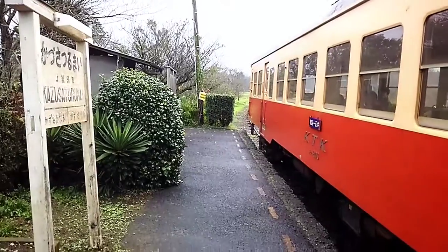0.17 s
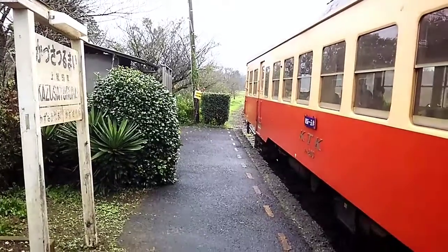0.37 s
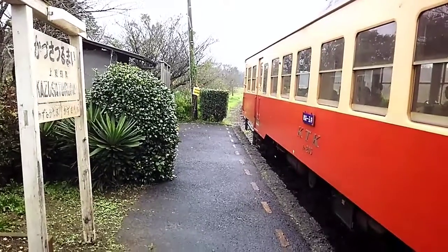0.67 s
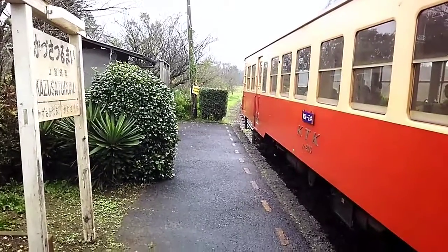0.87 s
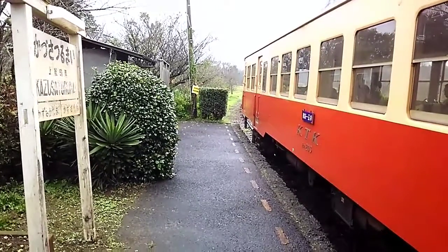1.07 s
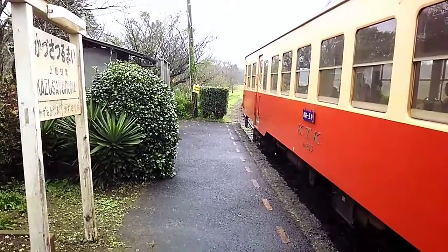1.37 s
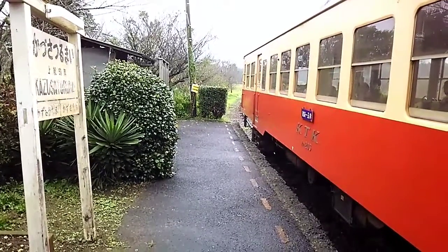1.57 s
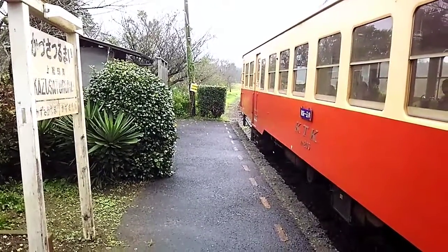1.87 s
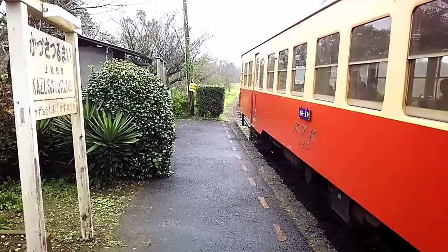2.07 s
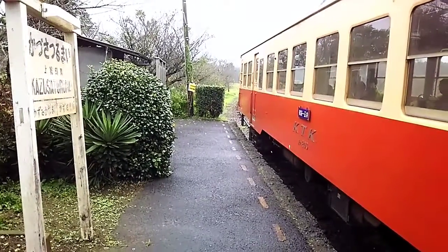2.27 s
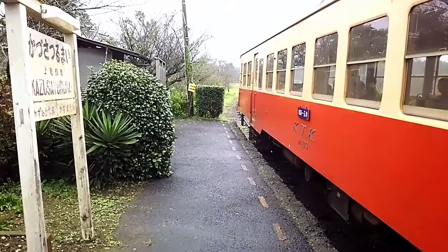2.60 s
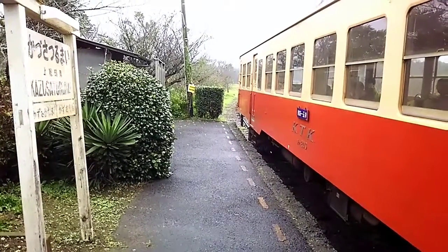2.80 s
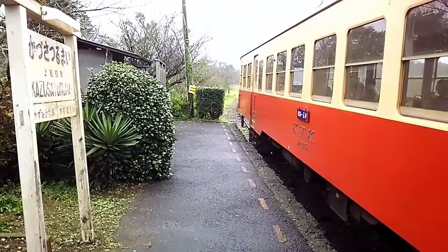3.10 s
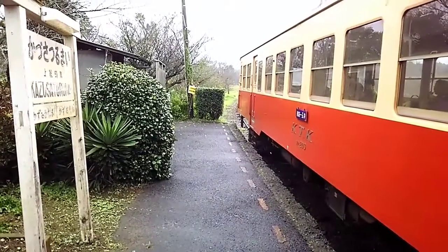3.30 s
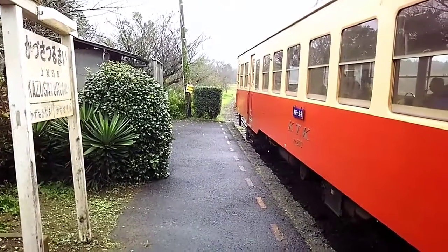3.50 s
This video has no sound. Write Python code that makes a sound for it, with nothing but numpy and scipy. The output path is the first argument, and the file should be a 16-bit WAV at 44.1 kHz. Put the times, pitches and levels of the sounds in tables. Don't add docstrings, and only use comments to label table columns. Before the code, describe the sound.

A diesel railcar engine fades in at a rattly idle, then takes up load with a bright coupling clank, a second duller clank with thuds, and a rising low exhaust growl, heard from an open platform.

```python
import sys
import numpy as np
from scipy import signal
from scipy.fft import rfft, irfft
from scipy.io import wavfile
from scipy.ndimage import uniform_filter1d

SR = 44100
rng = np.random.default_rng(int(sys.argv[2]) if len(sys.argv) > 2 else 0)


def put_to_file(sound):
    columns = np.atleast_2d(sound).T
    safe = np.clip(columns, -1, 1)
    whole_steps = np.round(safe * 32767)
    wavfile.write(sys.argv[1], SR, whole_steps.astype(np.int16))


def rack_gain(trim_db):
    fader = np.asarray(trim_db, float)
    return 10 ** (fader / 20)


N = 160965
LOAD_FROM_S, LOAD_OVER_S = 1.45, 0.14
# frequency in Hz, level in dB.
CLATTER_IDLE = [(1120, -8.5), (1900, -11.5), (2600, -14), (3360, -2.5), (3750, -8.5), (6460, -6),
                (7340, -16.5), (13700, -60), (14500, -68)]
CLATTER_LOAD = [(1120, -52), (1900, -23), (2100, -10), (3160, -12.5), (3660, -3), (5270, -4), (6690, -1),
                (11700, -23), (13000, -28), (14000, -45)]
# frequency in Hz, level in dB.
CLANK_SPECTRA = [
    [(150, -20), (300, -7.5), (800, -2), (1200, -13), (1610, -10), (1890, -6), (2180, -7.5), (6510, 0),
     (13500, -26)],
    [(200, -23), (400, -12), (572, -2.5), (1330, -10.5), (5240, -14), (6900, -13), (9000, -37),
     (14000, -69)],
    [(1180, -41), (2000, -7), (4660, -10.5), (6670, -2), (14000, -35)],
]


def evened(x):
    return x / np.sqrt(np.mean(x ** 2) + 1e-20)


def add(mix, s, sound):
    part = mix[round(s * SR):][:len(sound)]
    part += sound[:len(part)]


def colour(x, points):
    f, db = np.transpose(points)
    hz = np.fft.rfftfreq(len(x), 1 / SR)
    gain = rack_gain(np.interp(np.log(hz + 1), np.log(f + 1), db, -90, -90))
    return evened(irfft(rfft(x) * gain, len(x)))


def resonate(x, hz, width):
    turn = np.exp(2j * np.pi * hz * np.arange(len(x)) / SR)
    r = np.exp(-np.pi * width / SR)
    return 2 * (turn * signal.lfilter([1 - r], [1, -r], x / turn)).real


def blow(rise, t60, size=22050):
    t = np.arange(size) / SR
    contact = np.sin(np.pi / 2 * np.minimum(t / rise, 1)) ** 2
    return contact * rack_gain(-60 * np.maximum(t - rise, 0) / t60)


def patchy(bins, frames, depth_db):
    a, b, p = rng.standard_normal((N // 128 + 5, 257, 3)).T
    p = uniform_filter1d(p, size=bins, axis=0)
    p = evened(uniform_filter1d(p, size=frames, axis=1))
    return signal.istft((a + 1j * b) * rack_gain(depth_db * p), nperseg=512, noverlap=384)[1][:N]


def bumps():
    # start in seconds, level in dB, ring in Hz.
    frame_knocks = [(0.385, -19, 385), (0.696, -10.5, 267), (0.729, -10, 269), (1.301, -13.5, 1440),
                    (1.496, -15, 393), (1.599, -13.5, 376), (1.629, -14, 263), (1.659, -21, 242),
                    (1.749, -21, 374), (1.85, -30, 1090), (1.864, -8.5, 200), (1.874, -15, 393),
                    (2.03, -23, 210), (2.091, -30, 288), (2.16, -16, 1070), (2.281, -13.5, 1410),
                    (2.299, -13, 845), (2.331, -21, 280), (2.363, -9.5, 287), (2.687, -17.5, 265),
                    (2.904, -23, 312), (2.933, -24, 277), (3.009, -12.5, 298), (3.089, -13, 428),
                    (3.202, -11.5, 382), (3.265, -8.5, 288), (3.38, -13, 202), (3.529, -12, 254),
                    (3.578, -13, 355), (3.634, -22, 592)]
    # start in seconds, level in dB.
    contacts = [(1.866, -16), (1.871, -18), (1.878, -12.5), (1.888, -16), (1.896, -10), (1.925, -15.5),
                (2.328, -16), (2.336, -13), (2.346, -11.5), (2.435, -25), (3.371, -27), (3.387, -23)]
    out = np.zeros(N)
    for s, db, hz in frame_knocks:
        noise = rng.standard_normal(4096)
        ring = evened(resonate(noise, hz, 55))
        ring += 0.52 * evened(resonate(resonate(noise, hz, 560), hz, 560))
        add(out, s - .004, rack_gain(db - 10.5) * ring * blow(0.0033, .16, size=4096))
    for s, db in contacts:
        clank = int(s > 2) + int(s > 3)
        crack = colour(rng.standard_normal(2048), CLANK_SPECTRA[clank])
        add(out, s - .001, rack_gain(db) * crack * blow(0.00043, 0.14, size=2048))
    return out


def thuds():
    # start in seconds, pitch in Hz.
    blows = [(.70, 268), (1.685, 75), (1.858, 165), (1.868, 100), (1.914, 75), (2.324, 288), (2.358, 275),
             (2.332, 870), (2.411, 75), (3.375, 345), (1.74, 200), (1.94, 140), (2.91, 90), (2.865, 78),
             (3.374, 150), (3.258, 290), (3.47, 125)]
    # level in dB, t60 in seconds.
    strengths = [(-15, 0.27), (-11.5, 0.095), (-10, 0.19), (-11.5, 0.17), (-11.5, 0.24), (-5.5, 0.084),
                 (-19.5, 0.41), (-14.5, 0.18), (-17.5, .14), (-18.5, 0.24), (-23, 0.13), (-19.5, .3),
                 (-21, .3), (-9.5, 0.08), (-11, 0.091), (-16.5, 0.23), (-20, 0.68)]
    out, t = np.zeros(N), np.arange(22050) / SR
    for (s, hz), (db, t60) in zip(blows, strengths):
        add(out, s, rack_gain(db) * np.sin(2 * np.pi * hz * t) * blow(0.012, t60))
    return out


def squeak():
    # start in seconds, end in seconds, pitch in Hz, level in dB.
    brake = (2.335, 2.422, 6960, -29)
    start, end, hz, db = brake
    t = np.arange(round((end - start) * SR)) / SR
    swell = np.sin(np.pi * t / t[-1]) ** 0.32
    rough = 0.77 * evened(resonate(rng.standard_normal(len(t)), hz, 60))
    out = np.zeros(N)
    add(out, start, rack_gain(db) * swell * (np.sin(2 * np.pi * hz * t) + rough))
    return out


def clanks():
    # start in seconds, level in dB, rise in seconds, t60 in seconds.
    strikes = [
        (1.861, -14.5, 0.012, 0.65),
        (2.324, -13, 0.013, 0.47),
        (3.366, -20.5, 0.0028, 1.08),
    ]
    # frequency in Hz, level in dB, t60 in seconds.
    clank_modes = [
        [(1670, -11, 0.27), (2380, -1.5, 0.12), (2820, -5, 0.077), (3620, -10, 0.063), (5000, -28, 0.33),
         (6650, -14, 0.94)],
        [(544, -11, 0.32), (2020, -16, 0.22), (3610, -10.5, 0.21), (5990, -13, 0.092), (850, -15, 0.56),
         (318, -18, 0.34)],
        [(6500, -13, 0.44)],
    ]
    out = np.zeros(N)
    for (s, db, rise, t60), tone, modes in zip(strikes, CLANK_SPECTRA, clank_modes):
        flutter = evened(uniform_filter1d(rng.standard_normal(22050), size=150))
        noise = rng.standard_normal(22050) * rack_gain(1.6 * flutter)
        rings = 0
        for hz, mode_db, mode_t60 in modes:
            ring = evened(resonate(resonate(noise, hz, 99), hz, 950))
            rings = rings + rack_gain(mode_db) * ring * blow(rise, mode_t60)
        add(out, s, rack_gain(db) * (colour(noise, tone) * blow(rise, t60) + 1.87 * rings))
    return out


def knocks():
    # start in seconds, level in dB, ring in Hz.
    hard_knocks = [(0.0385, -11.5, 5470), (0.1525, -20, 3300), (0.2234, -15, 3340), (0.2628, -16.5, 4160),
                   (0.4436, -14.5, 3250), (0.5132, -13, 3460), (0.613, -13.5, 6370), (0.7202, -19.5, 3300),
                   (0.9767, -26, 6600), (1.0135, -12, 3450), (1.118, -18.5, 3150), (1.1906, -21, 3160),
                   (1.2616, -19.5, 4020), (1.2974, -15.5, 3390), (1.4681, -16, 3460), (1.5084, -29, 5440),
                   (1.5319, -9.5, 3760), (1.534, -14, 4200), (1.8246, -16.5, 2360), (2.0303, -18, 3380),
                   (2.2504, -16, 3640), (2.253, -20, 4300), (2.279, -20.5, 3550), (2.2907, -13, 7050),
                   (2.4339, -16, 3500), (2.5025, -15.5, 5650), (2.528, -22.5, 3600), (2.67, -18, 3780),
                   (2.7247, -15, 3660), (2.81, -20, 3730), (2.9223, -14.5, 3680), (3.03, -20.5, 4000),
                   (3.0959, -14.5, 3760), (3.25, -21, 3750), (3.33, -20, 3820), (3.6076, -30, 6660)]
    out = np.zeros(N)
    for s, db, hz in hard_knocks:
        noise = rng.standard_normal(8192)
        ring = 1.27 * evened(resonate(resonate(noise, hz, 140), hz, 1300))
        ring += 0.33 * evened(resonate(resonate(noise, 1.16 * hz, 260), 1.22 * hz, 1200))
        ring += colour(noise, CLATTER_IDLE if s < LOAD_FROM_S + LOAD_OVER_S else CLATTER_LOAD)
        add(out, s - .003, rack_gain(db - 12.5) * ring * blow(0.0043, 0.23, size=8192))
    return out


def ticks():
    # start in seconds, level in dB.
    air_ticks = [(0.156, -32), (0.2583, -29), (0.5467, -28), (0.835, -28.5), (1.1318, -29.5),
                 (1.413, -29.5), (1.6457, -35), (1.829, -24.5), (2.64, -25.5)]
    out = np.zeros(N)
    for s, db in air_ticks:
        noise = rng.standard_normal(8192)
        hiss = evened(resonate(resonate(noise, 9100, 3800), 9100, 3800))
        add(out, s - .005, rack_gain(db - 6.5) * hiss * blow(0.0059, .3, size=8192))
    return out


def firing_cycle():
    # time in seconds, rate in firings per second.
    speed = [(.22, 27.6), (1.37, 28.45), (1.47, 29.5), (1.62, 35), (2.0, 31.5), (2.4, 33.8), (2.65, 36),
             (2.85, 40.4), (3.0, 49), (3.16, 49.6), (3.3, 53.6), (3.5, 58.7), (3.65, 64.4)]
    first_firing_s = .2229
    rate = np.interp(np.arange(N) / SR, *np.transpose(speed))
    turns = np.cumsum(rate) / SR
    turns = turns - turns[round(first_firing_s * SR)] + 8
    return rate, turns.astype(int), turns % 1 / rate


def firing_gate(since, floor, fall, db):
    return uniform_filter1d(floor + rack_gain(db) * np.exp(-since / fall), size=130)


def clatter(k, since, load):
    tappet_db = [4.5, 7.5, 6.5, 5.5, 3.5, 5.5, 5.5, 1]
    covers_hz = [4290, 4930, 5580, 6580]
    strength_db = np.take(tappet_db, k % 8) + rng.standard_normal(400)[k]
    drive = patchy(6, 6, 2.98) * firing_gate(since, 0.65 + 0.35 * load, 0.034, strength_db)
    out = (1 - load) * colour(drive, CLATTER_IDLE) + load * colour(drive, CLATTER_LOAD)
    out += sum(1.04 * resonate(evened(drive), hz, 160) for hz in covers_hz)
    return out + 2.3 * load * resonate(evened(drive), 3585, 140)


def block_roar(k, since, load):
    # frequency in Hz, level in dB.
    idle_roar = [(59, -37), (100, 2.5), (187, -10), (260, -12), (712, -9), (1130, -7), (1330, -14.5),
                 (1680, -15), (2600, -45), (3380, -38), (5720, -120)]
    load_roar = [(59, 2), (100, -7.5), (246, -13), (391, -10.5), (513, -13), (974, -11.5), (1700, -17),
                 (1900, -27.5), (2600, -43), (3380, -64), (5720, -120)]
    # frequency in Hz, bandwidth in Hz, level in dB.
    panels = [
        (280, 124, -6),
        (404, 21, -2),
        (895, 220, -19),
        (1070, 61, -15),
    ]
    strength_db = 1.63 * rng.standard_normal(400)[k]
    drive = patchy(5, 20, 1.55) * firing_gate(since, 1.0, 0.029, strength_db)
    roar = (1 - load) * colour(drive, idle_roar) + load * colour(drive, load_roar)
    ringing = sum(rack_gain(db + 15) * resonate(evened(drive), hz, w) for hz, w, db in panels)
    return evened(roar + ringing)


def exhaust(rate, k, since, load):
    cylinder_db = [5, -8.5, 4.5, -4.5, 1, 4.5, -2, -23]
    # frequency in Hz, bandwidth in Hz, level in dB.
    pipe_modes = [
        (52.5, 10.6, 1.5),
        (81.3, 14.7, -1.5),
        (95.6, 43, -4),
        (140, 78, -16),
    ]
    uneven_db = 26
    strength_db = np.take(cylinder_db, k % 8) * (1 - load) + 0.73 * rng.standard_normal(400)[k]
    strength_db += uneven_db * np.clip(rate / 45 - .6, 0, 1) * (-1.) ** k
    puffs = rack_gain(strength_db) * np.exp(-since / 0.0029) * (1 - np.exp(-since / 0.00042))
    puffs = evened(puffs - uniform_filter1d(puffs, size=3000))
    puffs += 2 * rng.standard_normal(N)
    pipe = 0
    for hz, w, db in pipe_modes:
        pipe = pipe + rack_gain(db) * resonate(resonate(puffs, hz, 1.07 * w), hz, 1.07 * w)
    return pipe / np.sqrt(uniform_filter1d(pipe ** 2, size=15000) + 1e-9)


def boom():
    # time in seconds, pitch in Hz, level in dB.
    note = [(2.9, 49.8, -47), (2.978, 48.5, -22), (3.082, 48.6, -31), (3.158, 49.66, -19),
            (3.476, 57.6, -27), (3.538, 63, -32), (3.566, 64.5, -51), (3.578, 64.7, -35), (3.65, 64.5, -18)]
    # multiple of the note's pitch, level in dB.
    orders = [
        (1, 3.5),
        (1.5, -14),
        (2, -12),
        (2.5, -21),
        (3, -21),
    ]
    trough_s = 3.168
    t = np.arange(N) / SR
    s, hz, db = np.transpose(note)
    turns = np.cumsum(np.interp(t, s, hz)) / SR
    turns -= turns[round(trough_s * SR)]
    troughs = sum(rack_gain(d) * np.cos(np.pi * round(2 * m) * turns) for m, d in orders)
    return -rack_gain(np.interp(t, s, db, -90) + 5.5) * troughs


def engine():
    # time in seconds, exhaust in dB, block roar in dB, clatter in dB.
    effort = [(.22, -32, -24.5, -28), (.75, -31, -25, -28.5), (1.4, -32, -24, -26), (1.55, -38, -27.5, -31),
              (1.8, -32, -28.5, -34.5), (2.2, -35, -28, -36.5), (2.58, -36, -30.5, -35.5),
              (2.75, -34, -27, -33), (3.0, -27.5, -26, -31.5), (3.2, -28, -25, -32),
              (3.48, -23, -27.5, -33), (3.57, -26.5, -23.5, -36.5), (3.65, -23, -22, -30)]
    t = np.arange(N) / SR
    s, *levels = np.transpose(effort)
    exhaust_db, roar_db, clatter_db = (np.interp(t, s, level) for level in levels)
    rate, k, since = firing_cycle()
    load = np.clip((t - LOAD_FROM_S) / LOAD_OVER_S, 0, 1)
    out = rack_gain(exhaust_db + 5.5) * exhaust(rate, k, since, load)
    out += rack_gain(roar_db + 5.5) * block_roar(k, since, load)
    return out + rack_gain(clatter_db + 2.5) * clatter(k, since, load)


def scene():
    running_gear = bumps() + thuds() + squeak() + clanks()
    return (running_gear + knocks() + ticks() + boom() + engine())[None]


def band_limit(x):
    return signal.sosfilt(signal.butter(12, 14640, fs=SR, output="sos"), x)


def record(dry):
    # time in seconds, level in dB.
    fade = [(0, -105), (0.02, -34), (.04, -20), (.15, -11), (.22, -7), (.3, -6.5), (3.647, -5.5),
            (3.65, -27)]
    # frequency in Hz, threshold in dB.
    band_gate = [(1900, -50), (2200, -7), (7500, -6), (9000, -3), (13500, -1.5), (14000, 1)]
    low_hz, high_hz = 30, 14020
    overloaded = 1.3 * np.tanh(dry / 1.3)
    hz, _, z = signal.stft(overloaded, SR, nperseg=2048, noverlap=1024)
    power = uniform_filter1d(abs(z) ** 2, size=6, axis=1)
    power = uniform_filter1d(power, size=3, axis=2) + 1e-18
    neighbours = np.exp(uniform_filter1d(np.log(abs(power)), size=40, axis=1))
    threshold = neighbours * rack_gain(2 * np.interp(hz, *np.transpose(band_gate)))[:, None]
    in_band = ((hz < high_hz) & (hz > low_hz))[:, None]
    kept = signal.istft(z * (power > threshold) * in_band, SR, nperseg=2048, noverlap=1024)[1][:, :N]
    fade_in = rack_gain(np.interp(np.arange(N) / SR, *np.transpose(fade)))
    return band_limit(kept * fade_in)


dry = scene()
out = record(dry)
put_to_file(out)
```